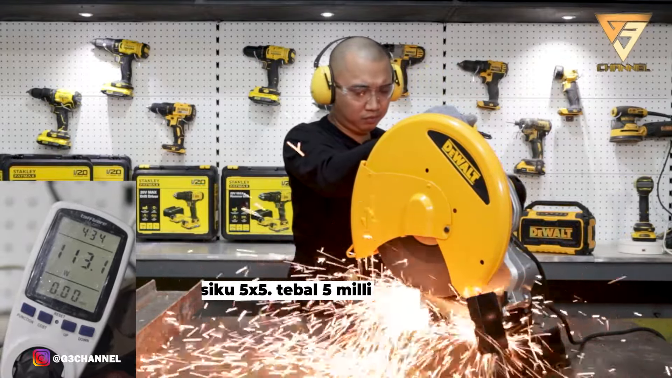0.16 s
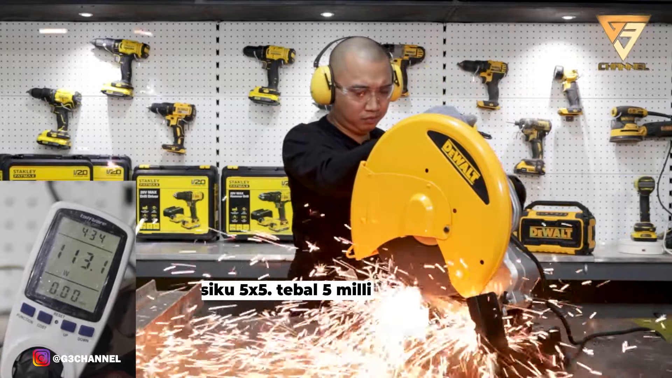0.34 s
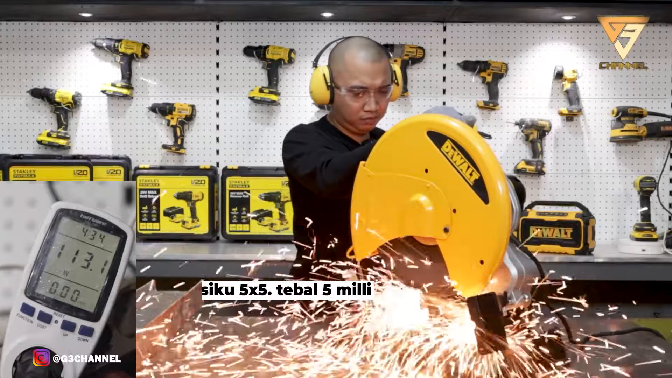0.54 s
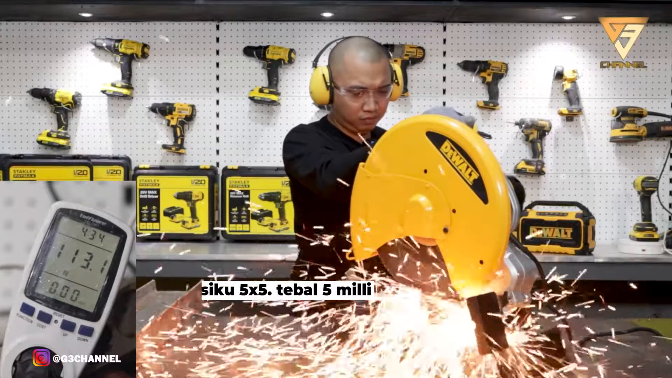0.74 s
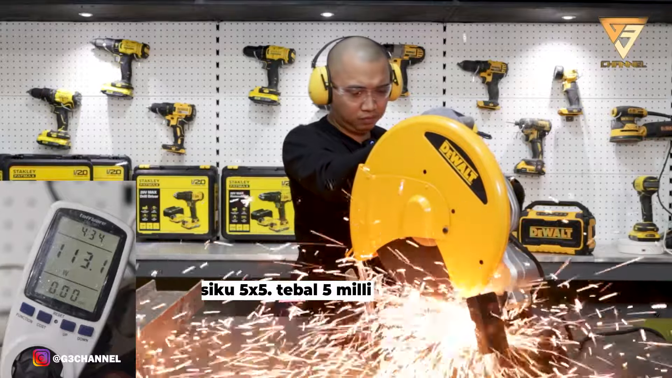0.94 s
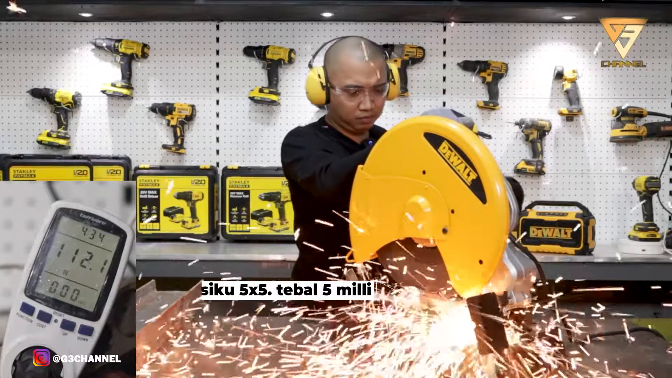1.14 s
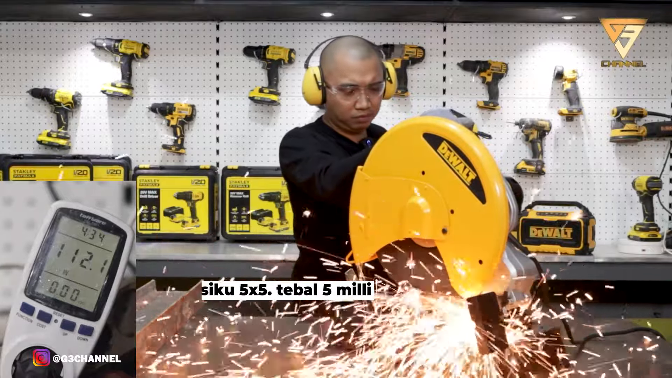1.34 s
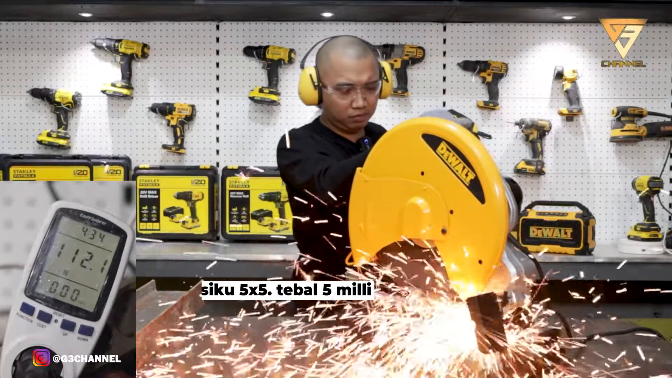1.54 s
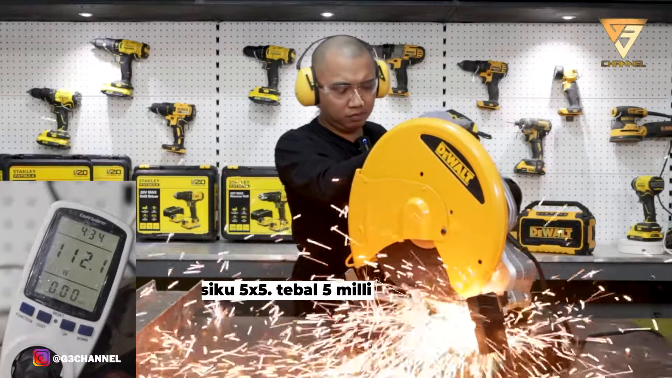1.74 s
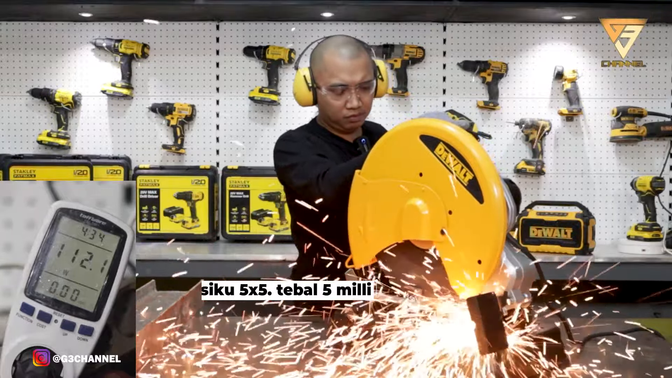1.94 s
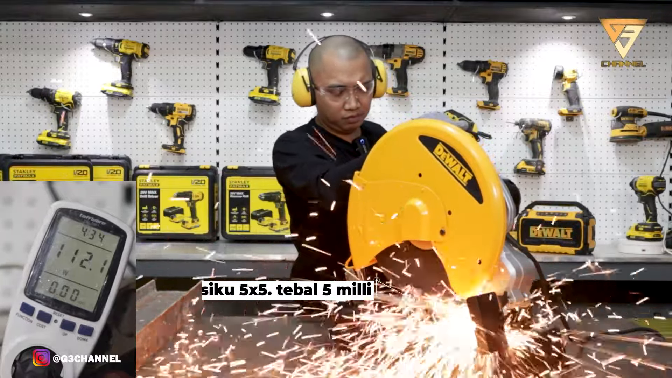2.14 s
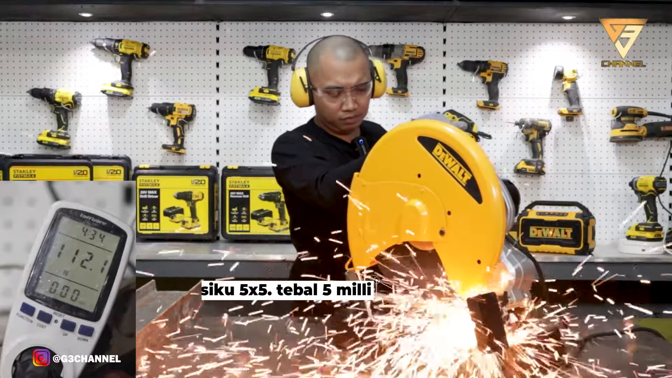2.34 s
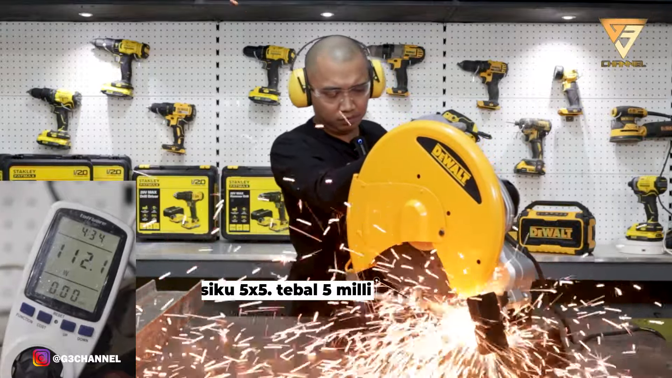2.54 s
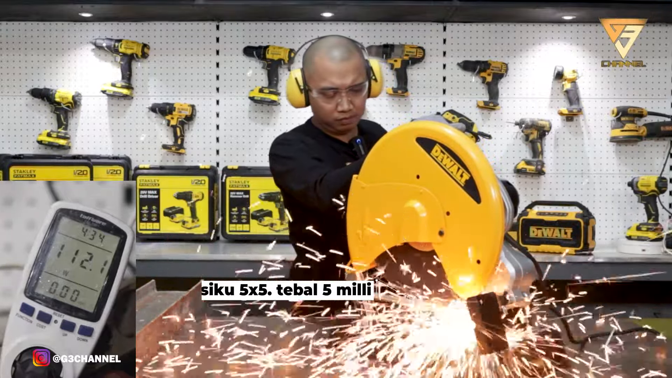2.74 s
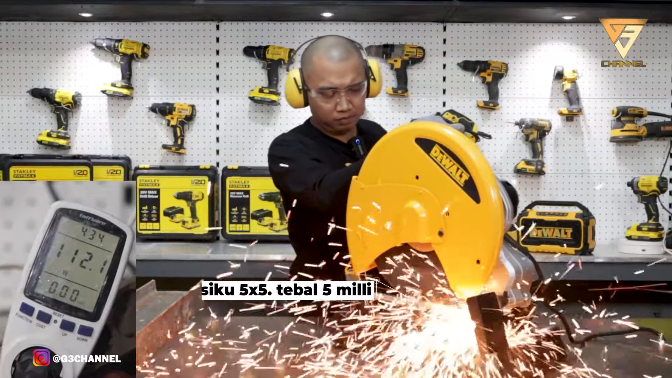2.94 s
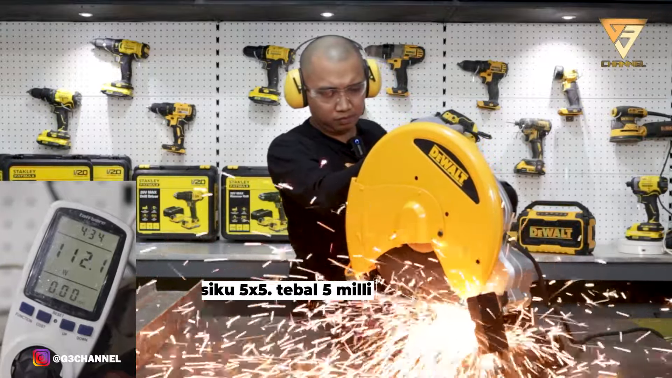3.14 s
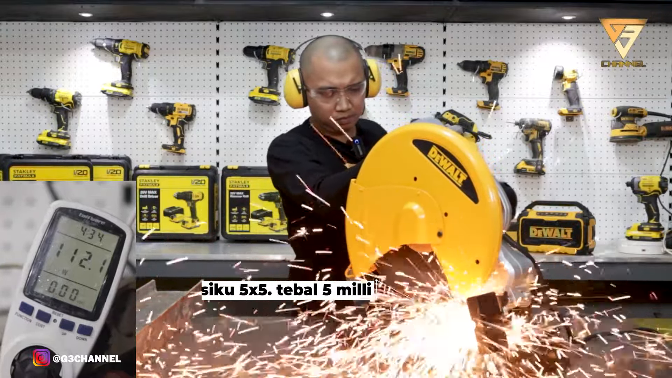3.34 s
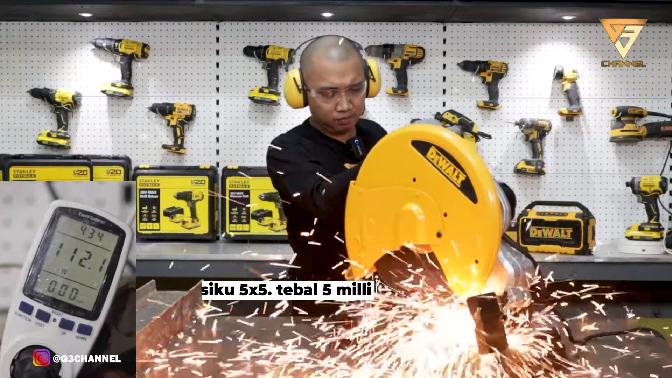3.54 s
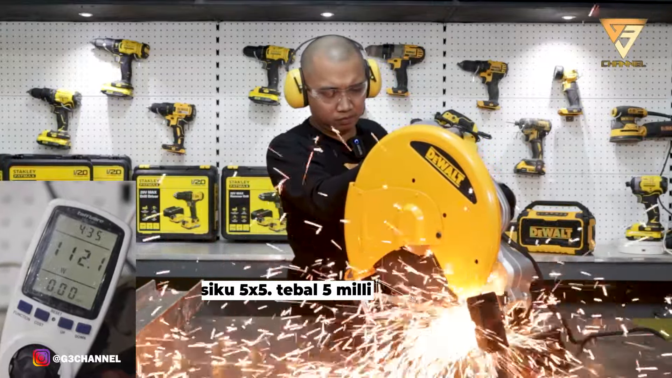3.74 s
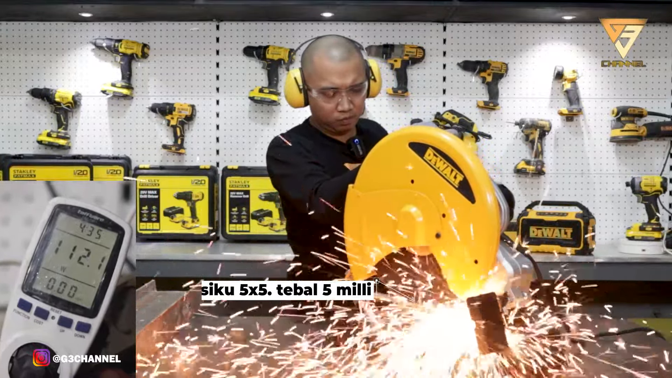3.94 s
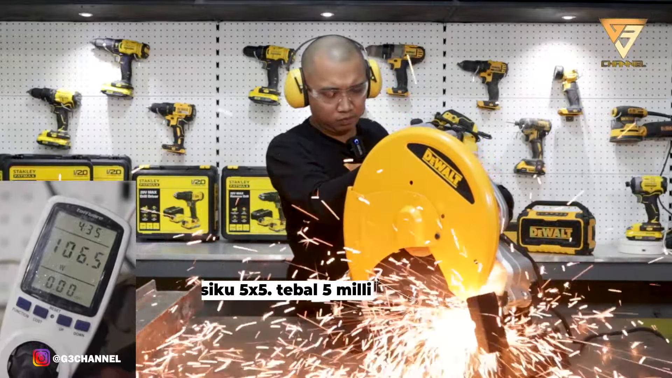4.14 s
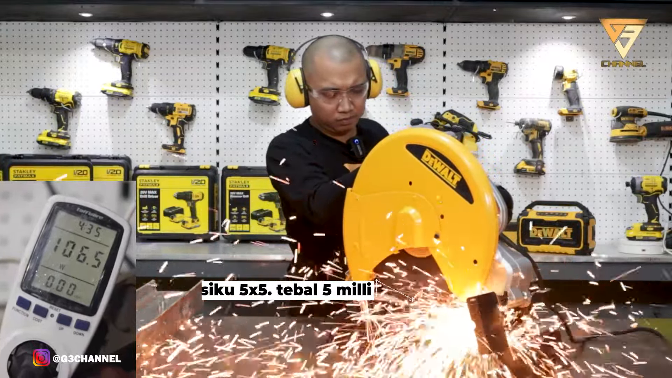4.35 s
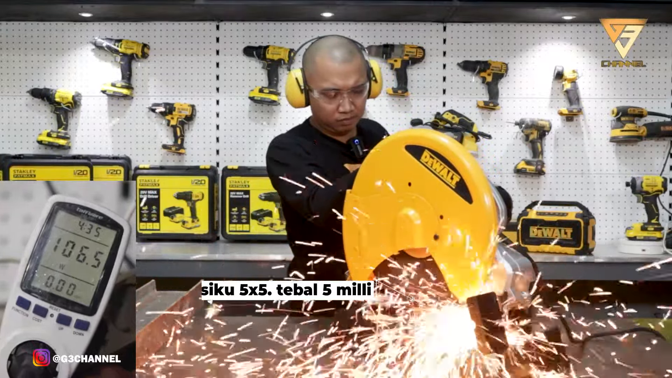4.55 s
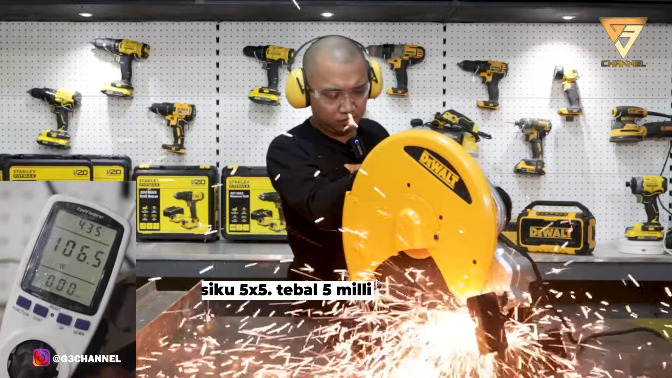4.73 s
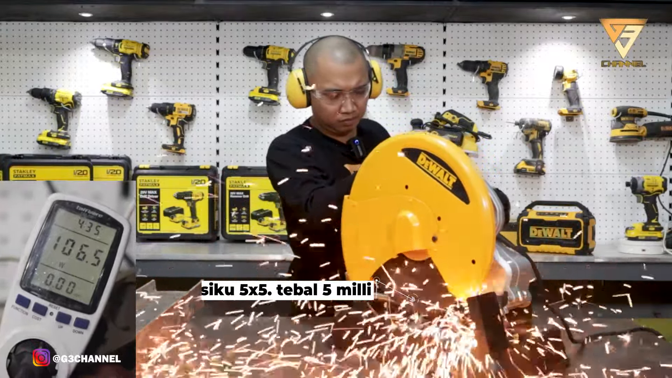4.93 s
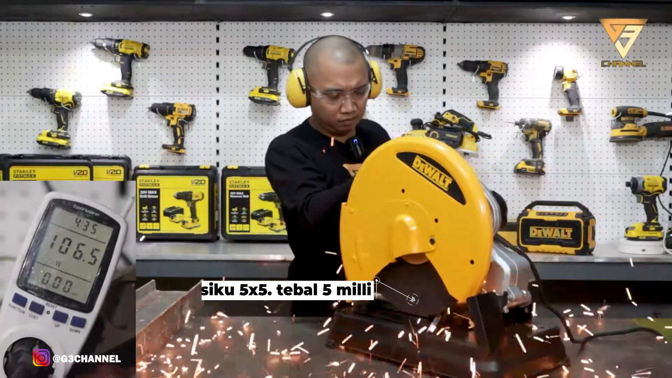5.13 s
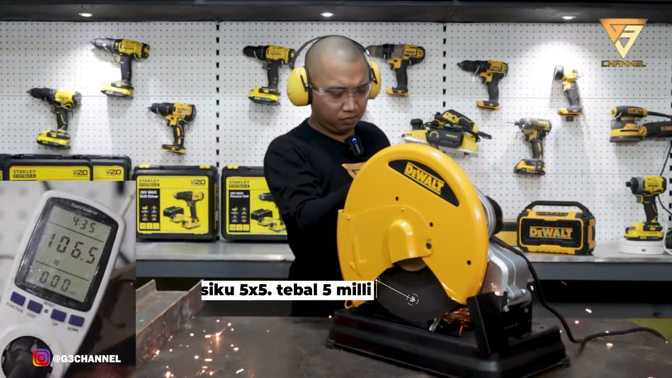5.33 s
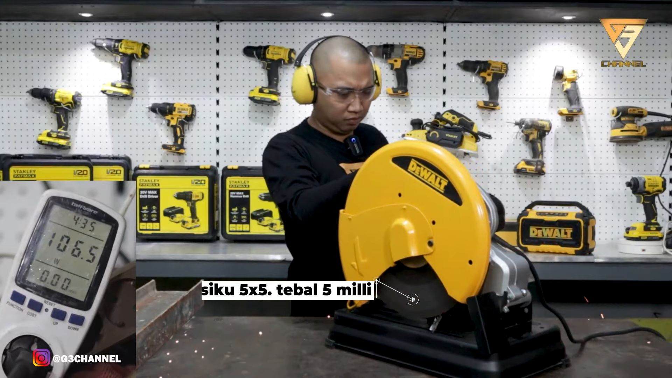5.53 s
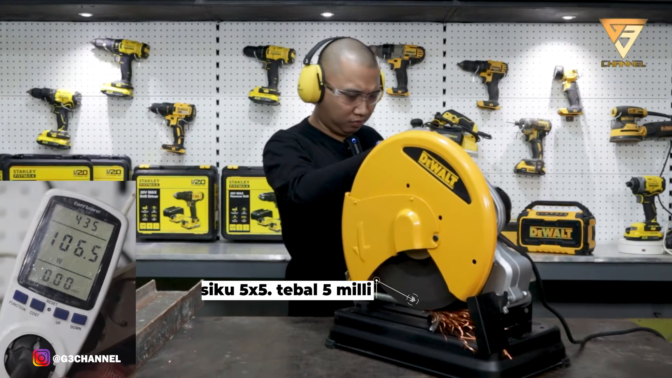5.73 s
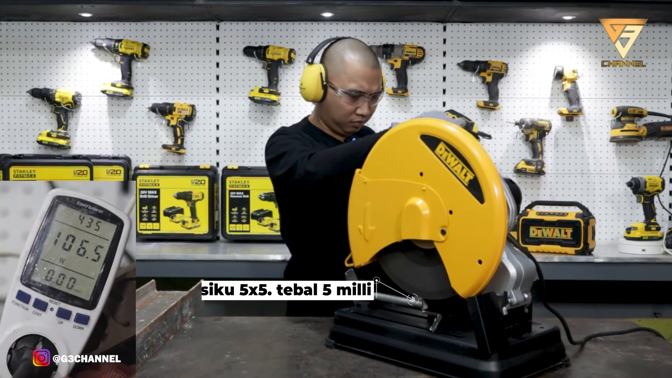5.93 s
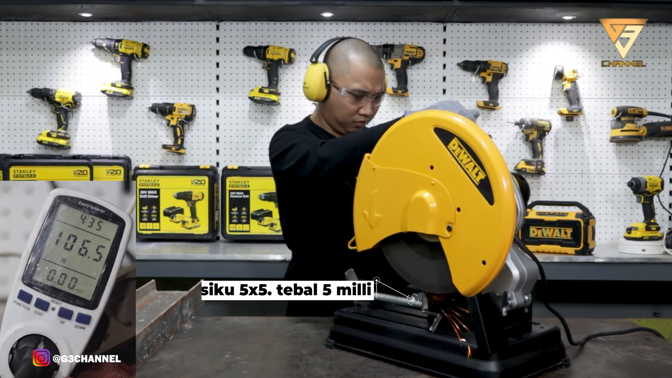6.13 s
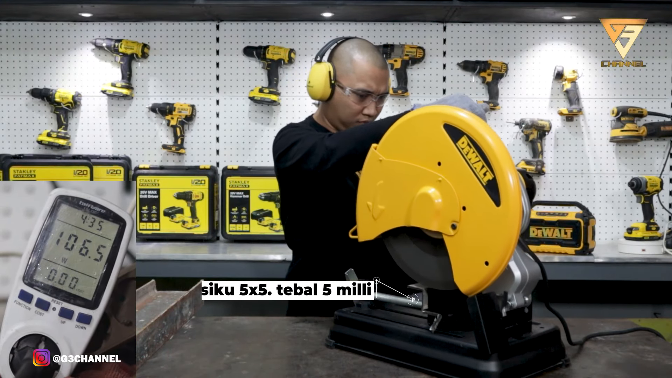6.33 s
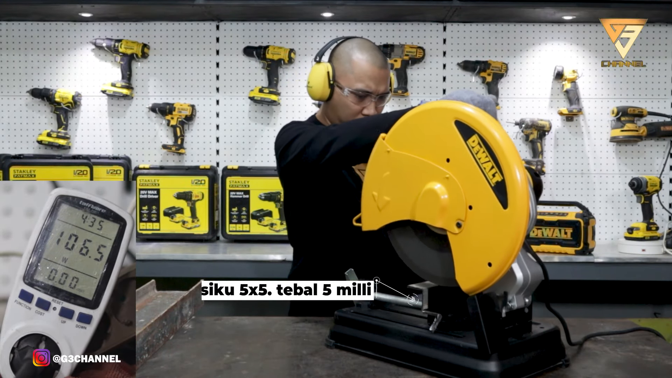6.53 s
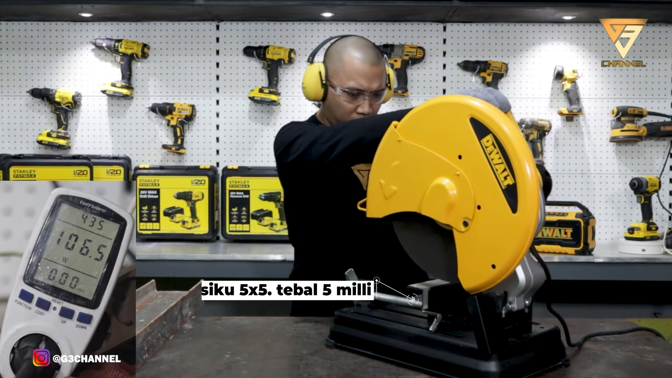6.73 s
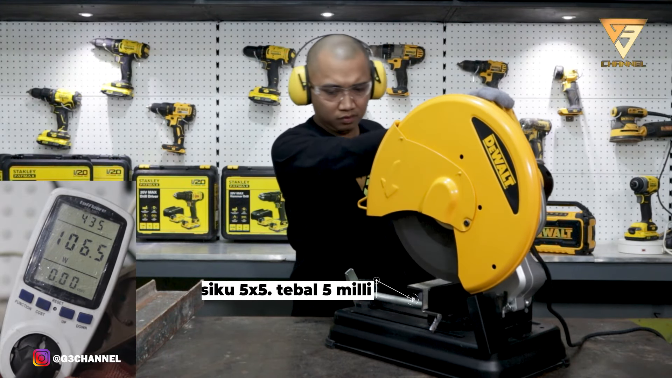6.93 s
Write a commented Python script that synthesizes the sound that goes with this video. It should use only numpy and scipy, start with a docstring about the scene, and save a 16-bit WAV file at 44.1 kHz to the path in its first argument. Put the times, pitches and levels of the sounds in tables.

```python
"""Chop saw cutting steel

An abrasive chop saw grinds through steel angle iron in a small workshop. The same grit passes the steel on
every turn, so noise read round a slowly wearing rim rasps at wheel speed and rings the steel's resonances.
Once through, the warped wheel brushes the kerf (the slot it cut) twice a turn: pulsing, hissing noise.
The motor is switched off and whines down as a tone locked to its shaft, over filtered air noise and rumble."""
import sys
import numpy as np
from scipy import signal
from scipy.fft import rfft, irfft, next_fast_len
from scipy.io import wavfile
from scipy.ndimage import uniform_filter1d, map_coordinates

SR = 44100
rng = np.random.default_rng(int(sys.argv[2]) if len(sys.argv) > 2 else 0)


def int16_out(signal):
    """Quantize to a 16-bit WAV file."""
    q = np.round(np.clip(np.atleast_2d(signal).T, -1, 1) * 32767)
    wavfile.write(sys.argv[1], SR, q.astype(np.int16))


N = 307804
TIME = np.arange(N) / SR
THROUGH_S, SWITCH_OFF_S = 5.0, 5.65   # the steel is cut through; the motor is switched off


def from_db(db):
    """Turn decibels into a gain."""
    return 10 ** (np.asarray(db) / 20)


def rms_one(x):
    """Scale a sound to an average power of 1."""
    return x / np.sqrt(np.mean(x ** 2) + 1e-20)


def in_time(rows):
    """Read each column of a curve at every sample, with straight lines between its points."""
    s, *columns = np.transpose(rows)
    return [np.interp(TIME, s, c) for c in columns]


def until(end_s, fade_s):
    """Step smoothly from 1 down to 0, halfway at end_s."""
    return .5 - .5 * np.tanh((TIME - end_s) / fade_s)


def drift(rate):
    """Wander at random between points of spread 1, `rate` points per second."""
    knots = rng.standard_normal(4096)
    return np.interp(TIME * rate, np.arange(len(knots)), knots)


def noise():
    """White noise: every frequency equally strong."""
    return rng.standard_normal(N)


def coloured(x, spectrum):
    """Shape a sound by a broad curve of (f/Hz, level/dB), then scale it to rms 1."""
    hz, db = np.transpose(spectrum)
    size = next_fast_len(N + 4096, real=True)
    bins = np.maximum(np.fft.rfftfreq(size, 1 / SR), 1)
    gain = from_db(np.interp(np.log(bins), np.log(hz), db))
    return rms_one(irfft(rfft(x, size) * gain, size)[:N])


def resonate(x, modes):
    """Ring resonances of (f/Hz, width/Hz, level/dB) side by side, then scale to rms 1."""
    out = 0
    for k, (hz, width, db) in enumerate(modes):
        r = np.exp(-np.pi * width / SR)   # a narrow resonance rings longer
        poles = [1, -2 * r * np.cos(2 * np.pi * hz / SR), r * r]
        ring = (1 - r * r) * signal.lfilter([1, 0, -1], poles, x)
        out = out + (-1) ** k * from_db(db) * ring   # neighbours get opposite signs
    return rms_one(out)


def lift(pitch, resonances):
    """Decibels a gliding tone gains as it passes resonances of (f/Hz, width/Hz, lift/dB)."""
    return sum(db / (1 + (2 * (pitch - hz) / width) ** 2) for hz, width, db in resonances)


# wheel speed in the steel, sagging as the hand leans harder: (t/s, speed/turns per s)
CUT_SPEED = [(0, 46.05), (.55, 46.12), (.8, 46.65), (1.2, 46.77), (1.4, 47.45), (2.6, 48.1), (3.1, 48.95),
             (3.45, 48.25), (4.0, 47.9), (4.2, 47.0), (4.55, 46.66)]
LOADED_TURNS_PER_S, FREE_TURNS_PER_S = 47.5, 51.5
RUN_UP_S, HALVING_S = .22, 3.112   # time constant of the run-up; time for coasting to halve the speed


def wheel_speed():
    """Turns per second: held down by the cut, racing once through, then coasting against air drag."""
    loaded, = in_time(CUT_SPEED)
    racing_s = np.clip(TIME, THROUGH_S, SWITCH_OFF_S) - THROUGH_S
    driven = FREE_TURNS_PER_S + (loaded - FREE_TURNS_PER_S) * np.exp(-racing_s / RUN_UP_S)
    return driven / (1 + np.maximum(TIME - SWITCH_OFF_S, 0) / HALVING_S)


def ease():
    """How lightly the wheel runs: 0 at its usual loaded speed, 1 at free speed."""
    return (wheel_speed() - LOADED_TURNS_PER_S) / (FREE_TURNS_PER_S - LOADED_TURNS_PER_S)


def rim(turns, wear, size):
    """A random profile round the rim, read as it spins; a share `wear` is renewed on each turn."""
    keep = np.sqrt(1 - np.clip(wear, .01, 1))
    fresh = rng.standard_normal((512, size))
    profile = signal.lfilter([1], [1, -keep], fresh, axis=0).ravel()
    position = (turns + 20) * size   # skip 20 turns, so the wear has settled
    return rms_one(map_coordinates(profile, [position], order=3))


# colour of the grinding rasp: (f/Hz, level/dB)
RASP = [(71, -46), (120, -36), (295, -18.5), (550, -2), (632, -7), (726, 0), (1030, -2.5), (1750, -2),
        (2230, -5.5), (2440, -4.5), (3210, -5.5), (5790, -7.5), (7500, -16.5), (9750, -14), (16500, -120)]
# colour of the sizzle of chips: (f/Hz, level/dB)
SIZZLE = [(3240, -12.5), (5500, -14), (6300, -5.5), (7020, -0.5), (7600, -2), (8700, 3.5), (10200, 1),
          (12200, -1.5), (14100, -5.5), (15600, -17.5)]
# level of the rasp before its trims: (t/s, bass level/dB, middle level/dB)
RASP_LEVEL = [(0, -23.5, -18), (.62, -23.5, -18.5), (.9, -27, -21.5), (1.35, -27, -21.5),
              (2.05, -33, -20.5), (2.7, -31, -22.5), (3.7, -27.3, -21.5), (4.5, -27, -20),
              (4.8, -27, -16.5)]
# the steel's resonances change as the kerf deepens, one table a stage: (f/Hz, width/Hz, level/dB)
FIRST_BITE = [(2480, 160, -3), (3500, 24, -6), (4280, 41, -5), (5430, 51, -10), (6120, 77, -9),
              (7250, 28, -8), (7840, 34, -7), (8390, 24, -6), (9030, 38, 0), (9720, 48, -6),
              (10000, 36, -5), (10400, 57, -5), (11400, 55, -6), (12200, 20, -7), (13200, 130, -10),
              (14300, 35, -9)]
UPPER_LEG = [(894, 200, 0), (2930, 56, -4), (4790, 130, -7), (6960, 80, -7), (7740, 24, -4), (8670, 60, -1),
             (8920, 210, -1), (9400, 81, -3), (10000, 260, -2), (10400, 37, -4), (11200, 34, -4),
             (11400, 35, -3), (11800, 120, 0), (12200, 70, -4)]
CORNER = [(727, 130, -3), (4470, 64, -4), (4860, 73, -8), (6640, 42, -4), (7250, 89, -5), (8580, 63, -1),
          (8930, 65, 0), (9570, 150, 0), (9880, 46, -1), (10400, 310, 0), (10600, 29, -4), (11200, 68, -4),
          (11800, 120, -3), (12500, 76, -4), (12800, 110, -7), (13700, 310, -9)]
LOWER_LEG = [(721, 150, -4), (2520, 61, -7), (3400, 120, -10), (5220, 41, -12), (6980, 140, -7),
             (8200, 53, -5), (8450, 140, -3), (8680, 29, -3), (8980, 76, -5), (9370, 36, -6),
             (9720, 170, -3), (10500, 140, 0), (10900, 140, -6), (11500, 170, -7), (12600, 180, -4),
             (13700, 53, -10)]
LAST_WEB = [(1820, 45, -5), (2380, 21, -7), (2850, 110, -6), (3390, 47, -7), (3690, 64, -8), (3920, 29, -9),
            (4170, 51, -8), (4900, 190, -8), (5390, 110, -8), (6580, 31, -8), (7080, 100, -6),
            (8320, 40, -5), (8870, 70, 0), (9350, 110, -7), (9710, 37, -8), (9950, 32, -4),
            (10400, 140, -9), (10700, 80, -7), (11800, 140, -12), (12100, 67, -10), (12600, 27, -10),
            (13600, 40, -12)]
# stages of the cut: (start t/s, end t/s, resonances, ring level/dB added to the sizzle's)
STAGES = [(-.5, .62, FIRST_BITE, -4), (.62, 1.396, UPPER_LEG, -7), (1.41, 2.65, CORNER, -4),
          (2.65, 4.053, LOWER_LEG, -5), (4.045, 5.3, LAST_WEB, -5)]
# the nearly severed offcut chatters: (f/Hz, width/Hz, level/dB)
CHATTER = [(1630, 30, -2), (1820, 60, 0), (2380, 30, -2), (2850, 100, -11), (3400, 60, -6), (3700, 70, 0),
           (3920, 50, -2), (4180, 70, -3), (4980, 210, -2), (5400, 140, -2)]
# a lightly loaded wheel sizzles more and its high spot strikes harder:
# dB at loaded speed (sizzle before its trim), and rise in dB at free speed
SIZZLE_DB, SIZZLE_RISE_DB = -16.5, 2
HIGH_SPOT_DB, HIGH_SPOT_RISE_DB = 4.5, 3
THROUGH_FADE_S = 0.039


def grinding(turns):
    """Grit tears at the steel: a buzzing rasp, a sizzle of chips and the ringing of the workpiece."""
    low_db, mid_db = in_time(RASP_LEVEL)
    sizzle_db = SIZZLE_DB + SIZZLE_RISE_DB * ease()
    spot_db = HIGH_SPOT_DB + HIGH_SPOT_RISE_DB * ease()

    # the rim is lumpy, and its highest spot hits once a turn
    spot = np.exp(2.6 * (np.cos(2 * np.pi * turns) - 1))
    pressure = from_db(spot_db * spot + 1.5 * rim(turns, wear=0.082, size=24))
    # keep the pulses but level out slower changes
    pressure = pressure / np.sqrt(uniform_filter1d(pressure ** 2, size=4096))

    # big grains last for many turns, fine ones break away sooner
    coarse = rim(turns, wear=.16, size=1024) * pressure ** .1
    fine = rim(turns, wear=.42, size=1280) * pressure
    knocks = rim(turns, wear=.3, size=1280) * pressure ** .8

    # the low rasp is half repeating buzz, half loose roar of the spark stream
    low_pass = signal.butter(2, 1400, fs=SR, output="sos")
    rasp = coloured(coarse, RASP)
    buzz = signal.sosfiltfilt(low_pass, rasp)
    roar = signal.sosfiltfilt(low_pass, coloured(noise(), RASP))
    out = from_db(low_db - 3.0) * rms_one(buzz + roar)
    out += from_db(mid_db - 4.5) * rms_one(rasp - buzz)
    out += from_db(sizzle_db - 1.5) * coloured(fine, SIZZLE)

    for start, end, modes, ring_db in STAGES:
        stage = until(end, 0.25) - until(start, 0.097)
        out += stage * from_db(sizzle_db + ring_db) * resonate(knocks, modes)
    loose = 1 - until(4.9, 0.17)
    out += from_db(-30) * loose * resonate(coarse, CHATTER)
    out += squeals(knocks)

    # keep the grinding free of bass below about 250 Hz
    out = signal.sosfilt(signal.butter(3, 250, "high", fs=SR, output="sos"), out)
    return out * until(THROUGH_S + THROUGH_FADE_S, THROUGH_FADE_S)


# steady bands, from narrow squeals to a broad rasping one near 2.4 kHz:
# (start t/s, end t/s, f/Hz, half of each filter's width/Hz, level/dB)
SQUEALS = [(-.2, 0.534, 2300, 170, -33.5), (.1, .6, 4270, 45, -39), (.2, .65, 3500, 25, -38),
           (0.346, .8, 9030, 50, -29), (0.546, 0.848, 850, 110, -28.5), (.95, 1.35, 11600, 110, -27),
           (1.3, 2.4, 4530, 59.6, -34.5), (1.35, 2.0, 1215, 70.5, -33), (2.3, 3.7, 10240, 149, -28),
           (2.75, 3.15, 1197, 70, -33), (3.6, 4.202, 1763, 50, -33), (4.15, 4.62, 4210, 50, -40),
           (4.15, 4.55, 577, 90, -32.5), (3.4, 4.7, 2410, 220, -33), (4.4, 5.0, 8900, 110, -34)]


def squeals(grit):
    """Squeals by stick-slip, saturated so that they hold a steady level, and a broad rasping band."""
    out = np.zeros(N)
    for start, end, hz, half_width, db in SQUEALS:
        mode = [(hz, half_width * 2, 0)]
        ring = resonate(resonate(grit, mode), mode)   # filtered twice for a purer tone
        steady = ring / np.sqrt(uniform_filter1d(ring ** 2, size=2048) + 1e-6)
        out += from_db(db) * (until(end, 0.087) - until(start, 0.042)) * steady
    return out


# colour of the rubbing hiss: (f/Hz, level/dB)
RUB_COLOUR = [(2060, -42), (3500, -23), (3630, -8), (3990, -8), (5420, -16), (5770, -8.5), (7510, -3.5),
              (8570, 0.5), (11200, -1.5), (14200, -9.5), (15600, -26)]
# the severed ends ringing against the wheel's flanks: (f/Hz, width/Hz, level/dB)
CUT_ENDS = [(7980, 120, -7), (8790, 200, 0), (9250, 200, -1), (10300, 150, -3), (10700, 150, -3),
            (11600, 230, -1), (12650, 180, -5), (13700, 100, -10)]
# the offcut's ring when it is knocked: (f/Hz, width/Hz, level/dB)
OFFCUT = [(3600, 200, -5), (4900, 140, -2), (6020, 140, -4), (6890, 160, -4), (7980, 120, -2),
          (8600, 200, 0), (10300, 150, -3), (13900, 100, -6)]
# knocks: the cut breaking through, the offcut clanking, a light catch, ticks as the wheel leaves the kerf:
# (t/s, level/dB, length/s, ring of the offcut inside it, level/dB)
KNOCKS = [(5.07, -22.5, 0.037, -12), (5.156, -28, 0.026, 6.5), (5.9, -27, 0.032, -14),
          (6.328, -28, .003, -17), (6.340, -15.5, 0.0018, -22), (6.354, -35, 0.0075, -11)]
# the flanks brush the kerf as the wheel is raised: the hiss swells, holds, drops as the pressure eases, and fades
RUB_DB, RUB_FULL_S, RUB_EASES_S = -16, 5.38, 5.81
RUB_SWELL_DB_PER_S, RUB_FADE_DB_PER_S = 59, 10.5
RUB_EASE_DB, RUB_RAGGED_DB = 3, 0.8   # size of the drop; random unevenness


def rubbing(turns):
    """The wobbling wheel touches each side of the kerf once a turn, with a few knocks and ticks."""
    hiss_db = RUB_DB - RUB_SWELL_DB_PER_S * np.maximum(RUB_FULL_S - TIME, 0)
    hiss_db -= RUB_FADE_DB_PER_S * np.maximum(TIME - RUB_EASES_S, 0)
    hiss_db -= RUB_EASE_DB * (1 - until(RUB_EASES_S, .015))
    hiss_db += RUB_RAGGED_DB * drift(20)
    # two touches a turn, a little uneven
    touch = rms_one(from_db(3.9 * np.cos(4 * np.pi * turns) + 0.67 * drift(150)))
    in_kerf = until(6.28, 0.051) - until(5.07, 0.027)

    # deep in the kerf the steel rings in patches; as the wheel lifts out a thin bright hiss takes over
    hiss = coloured(noise(), RUB_COLOUR)
    deep = until(5.93, 0.064)
    ringing = np.zeros(N)
    for hz, width, db in CUT_ENDS:
        ringing += from_db(db + 5.0 * drift(12)) * resonate(noise(), [(hz, width, 0)])
    thin = resonate(noise(), [(10300, 660, 0), (13000, 1300, -9)])
    scrape = from_db(-3.5) * hiss
    scrape += from_db(-3) * deep * rms_one(ringing)
    scrape += from_db(-4) * (1 - deep) * thin

    # pressed hard against the flanks, the wheel makes the guard's body rasp as well
    body = from_db(-16) * until(5.74, .04) * resonate(noise(), [(1310, 270, -2), (1860, 730, -3)])
    out = from_db(hiss_db) * touch * in_kerf * (scrape + body)

    offcut = resonate(noise(), OFFCUT)
    for s, db, length, ring_db in KNOCKS:
        bump = np.exp(-.5 * ((TIME - s) / length) ** 2)
        out += from_db(db) * bump * (scrape + from_db(ring_db) * offcut)
    return out


# colour of the fan roar: (f/Hz, level/dB)
AIR_COLOUR = [(30, -38), (130, -30), (200, -27), (260, -18), (350, -14.5), (500, -10), (1000, -4),
              (1750, -7), (2400, -7.5), (3400, -11.5), (4500, -15.5), (6600, -16.5), (8300, -15.5),
              (9700, -12), (12000, -21), (14000, -24), (15600, -43)]
# hollow resonances of the guard: (f/Hz, width/Hz, level/dB)
GUARD = [(440, 50, -6), (544, 60, 0), (735, 80, -1), (910, 70, -4), (1720, 110, 1), (2420, 100, -9),
         (3290, 230, -10)]
# air through the guard swells only while the wheel races: dB before mixing its two parts, rise in dB at free speed
AIR_DB, AIR_RISE_DB = -24.5, 3.5


def air():
    """Fan roar, partly tuned by the hollow guard."""
    air_db = AIR_DB + AIR_RISE_DB * np.maximum(ease(), 0)
    roar = from_db(-2.5) * coloured(noise(), AIR_COLOUR)
    hollow = from_db(-6.0) * resonate(noise(), GUARD)
    return from_db(air_db + .5 * drift(30)) * (roar + hollow)


# unbalance of wheel and armature, before the changes below:
# (multiple of wheel speed, cutting level/dB, running free level/dB)
ORDERS_DB = [(1, -57.5, -58), (2, -62, -61), (5, -60.5, -60), (6.25, -74, -53.5), (7, -64, -70),
             (9, -52, -59)]
# the housing swells any order that passes these resonances: (f/Hz, width/Hz, lift/dB)
HOUSING = [(231.2, 5.3, 10), (321, 12, 15.5), (424.7, 11, 12)]
# peaks and a notch of the motor casing that the whine slides through: (f/Hz, width/Hz, lift/dB)
CASING = [(8600, 300, 9), (7900, 350, -11), (7630, 250, 7)]
# the saw shakes its base more as the kerf deepens (this slope is divided by the order's multiple)
SHAKE_DB_PER_S = 1
# shaking and bench rumble die away as the wheel slows (dB lost per halving of speed)
SHAKE_LOSS_DB, RUMBLE_LOSS_DB = 20, 40
# whine of the coasting motor (cycles per turn, dB before the casing), and its octave (dB re the whine)
WHINE_ORDER, WHINE_DB, WHINE_OCTAVE_DB = 180, -39, -28
MAINS_HZ, HUM_LINGERS_S = 50, 0.16


def motor(turns):
    """Unbalance tones, a rough whine locked to the shaft, and mains hum that dies after switch-off."""
    cutting = until(THROUGH_S + 0.15, 0.048)
    powered = until(SWITCH_OFF_S + HUM_LINGERS_S, .03)
    speed = wheel_speed()
    shake_db = SHAKE_DB_PER_S * (TIME - THROUGH_S / 2) * cutting
    halvings = np.log2(1 + np.maximum(TIME - SWITCH_OFF_S, 0) / HALVING_S)

    tones = np.zeros(N)
    for multiple, cut_db, free_db in ORDERS_DB:
        db = cutting * cut_db + (1 - cutting) * free_db
        db += lift(multiple * speed, HOUSING) + shake_db / multiple
        db += .35 * multiple * drift(9) - SHAKE_LOSS_DB * halvings
        tones += from_db(db) * np.sin(2 * np.pi * (multiple * turns + rng.random()))

    # the whine is heard only once the power is gone
    whine_db = WHINE_DB + lift(WHINE_ORDER * speed, CASING) + 2.5 * drift(45)
    angle = 2 * np.pi * WHINE_ORDER * turns + .8 * drift(160)   # random jitter makes it rough
    whine = np.sin(angle) + from_db(WHINE_OCTAVE_DB) * np.sin(2 * angle)
    tones += from_db(whine_db) * (1 - powered) * whine
    # hum at twice the mains frequency
    tones += from_db(-51.0 - 7.5 * cutting) * powered * np.sin(2 * np.pi * 2 * MAINS_HZ * TIME)

    # the bench rumbles under the spinning saw
    rumble_db = -50.5 - 4.0 * cutting - RUMBLE_LOSS_DB * halvings
    rumble = from_db(rumble_db) * resonate(noise(), [(160, 80, 0)])
    return np.sqrt(2) * tones + rumble   # root 2 makes the tones' dB an rms level


def workshop(x, t60, wet_db):
    """Dense short reflections from bench and walls, fading by 60 dB in t60 seconds."""
    t = TIME[:SR // 2]
    tail = rng.standard_normal(len(t)) * from_db(-60 * t / t60) * (t > .003)
    return x + from_db(wet_db) * signal.fftconvolve(x, tail / np.linalg.norm(tail))[:N]


# uneven bite makes the wheel's speed waver in the steel
WAVER_TURNS_PER_S = .03


def scene():
    """The wheel's angle drives grinding, rubbing and motor; one mono mix feeds both channels."""
    waver = WAVER_TURNS_PER_S * drift(6) * until(THROUGH_S, .05)
    turns = np.cumsum(wheel_speed() + waver) / SR
    saw = workshop(grinding(turns) + rubbing(turns) + air(), t60=0.32, wet_db=-9.5)
    return np.tile(saw + motor(turns), (2, 1))


CUTOFF_HZ = 15750


def record(dry):
    """Peaks are rounded and the top is cut."""
    rounded = .8 * np.tanh(dry / .8)
    top_cut = signal.ellip(12, .1, 90, CUTOFF_HZ, fs=SR, output="sos")
    return signal.sosfilt(top_cut, rounded)


dry = scene()
out = record(dry)
int16_out(out)
```